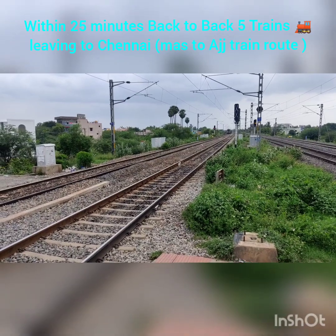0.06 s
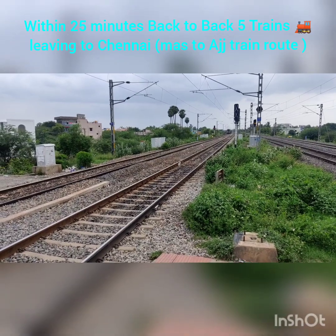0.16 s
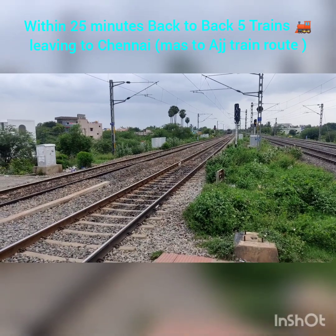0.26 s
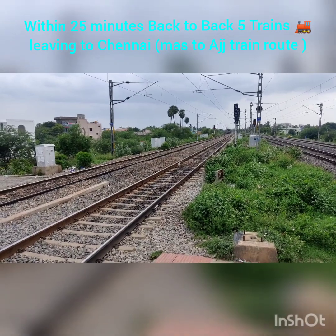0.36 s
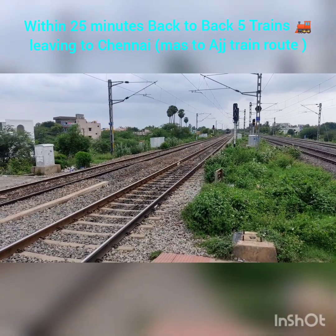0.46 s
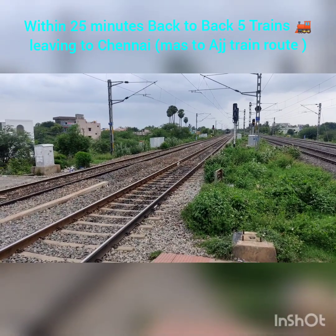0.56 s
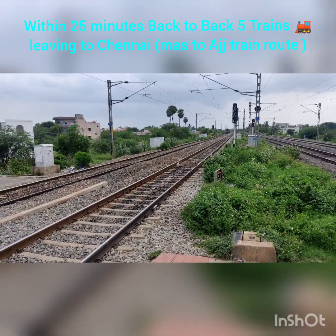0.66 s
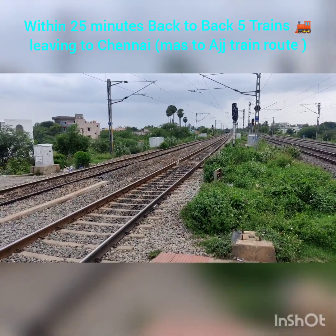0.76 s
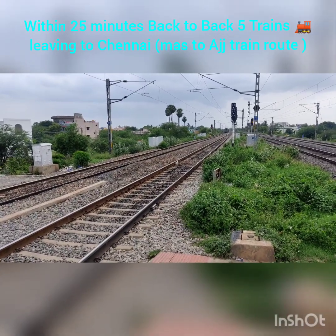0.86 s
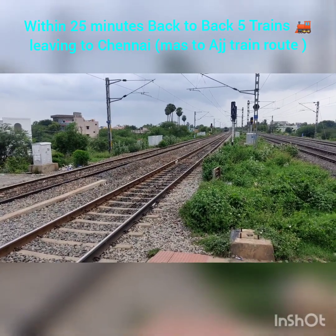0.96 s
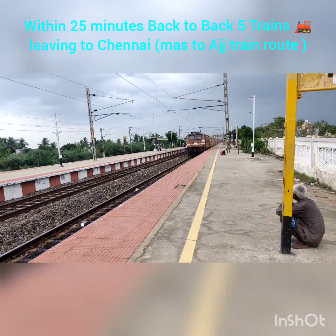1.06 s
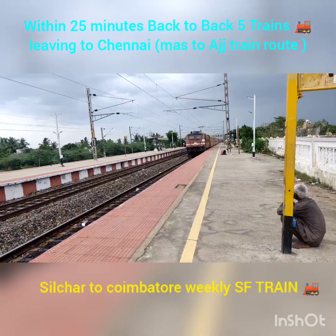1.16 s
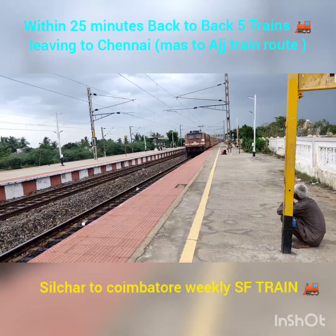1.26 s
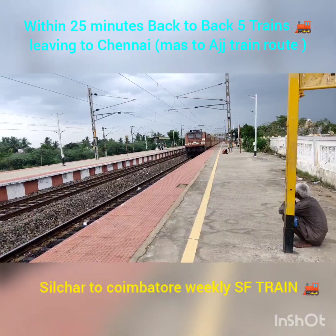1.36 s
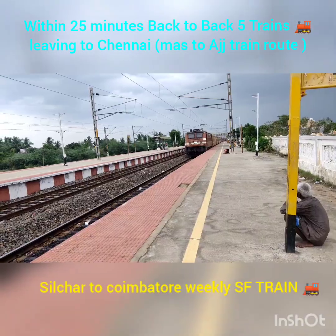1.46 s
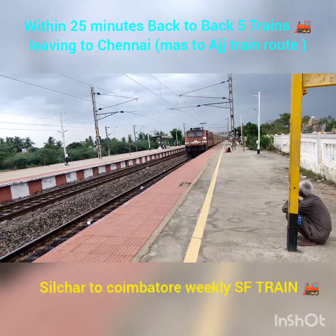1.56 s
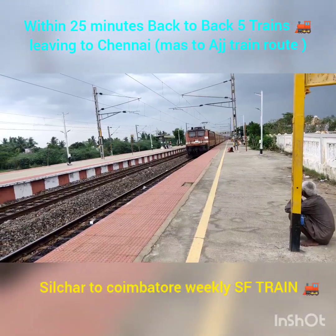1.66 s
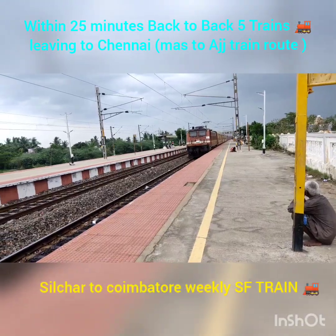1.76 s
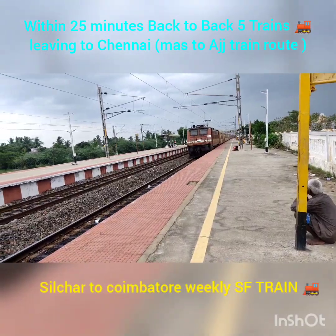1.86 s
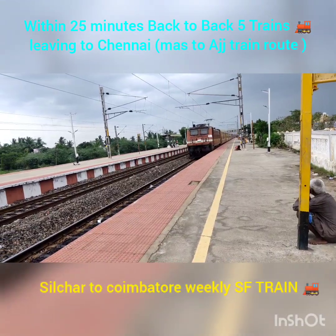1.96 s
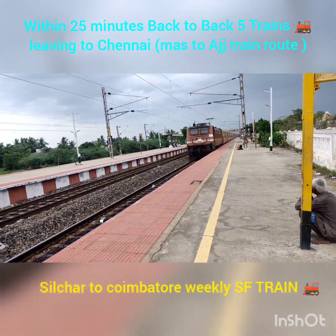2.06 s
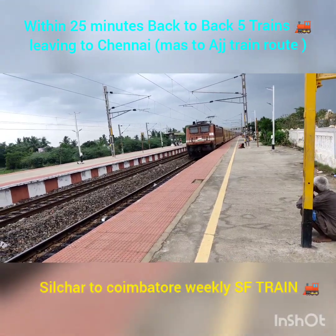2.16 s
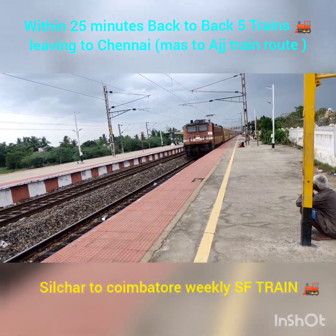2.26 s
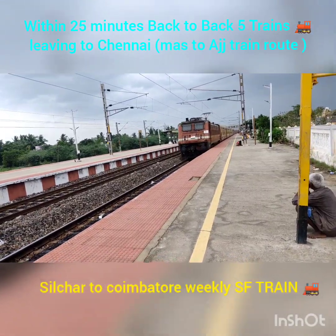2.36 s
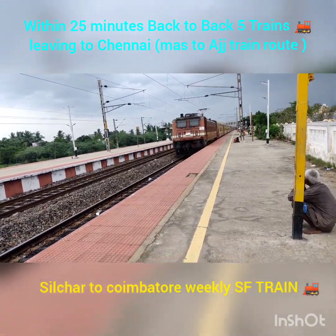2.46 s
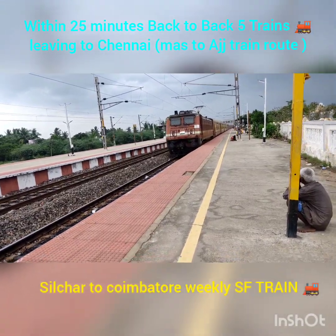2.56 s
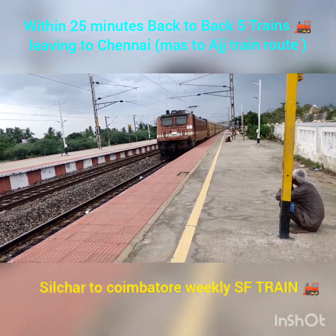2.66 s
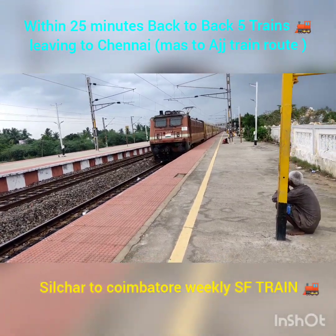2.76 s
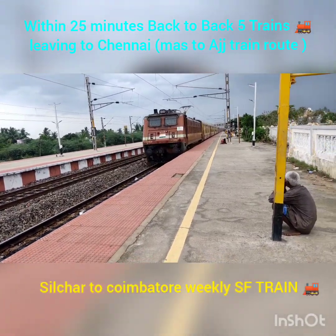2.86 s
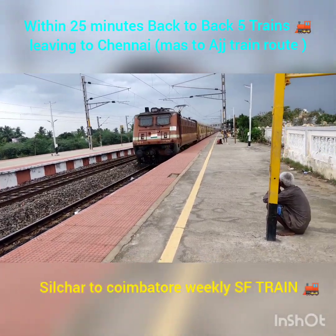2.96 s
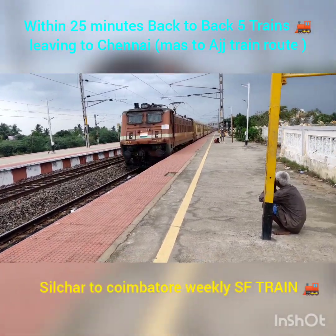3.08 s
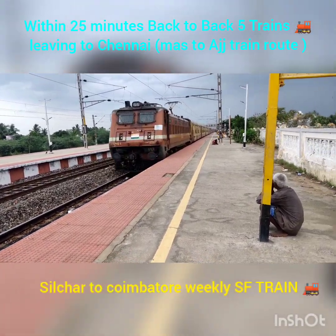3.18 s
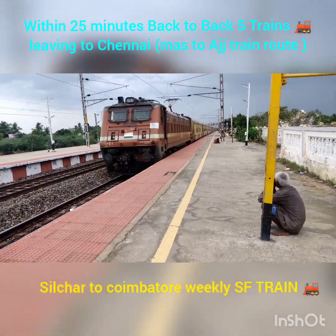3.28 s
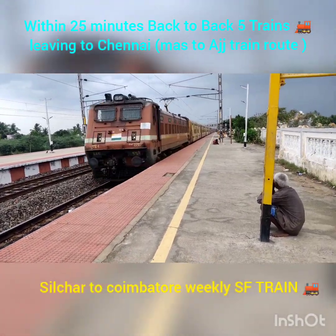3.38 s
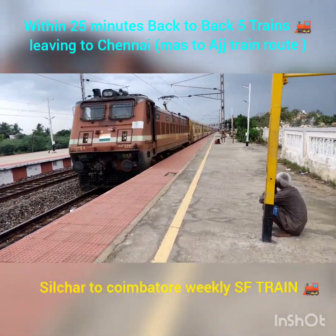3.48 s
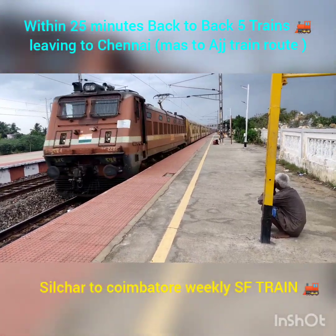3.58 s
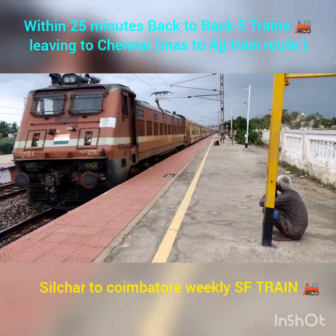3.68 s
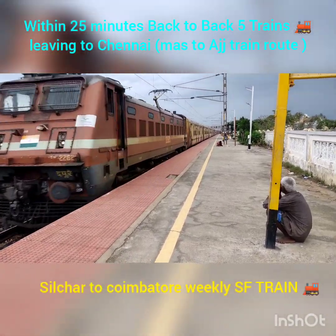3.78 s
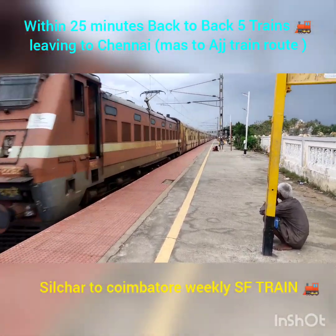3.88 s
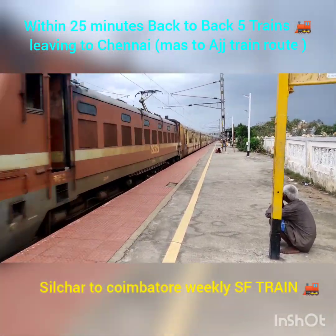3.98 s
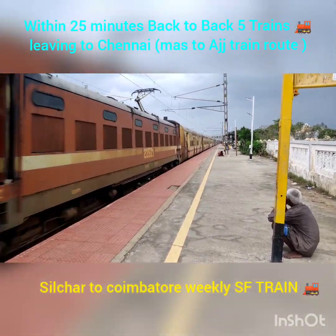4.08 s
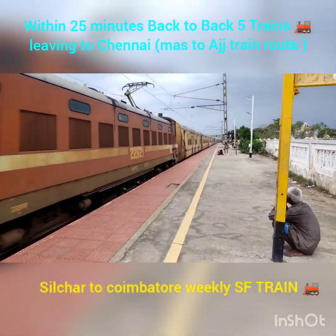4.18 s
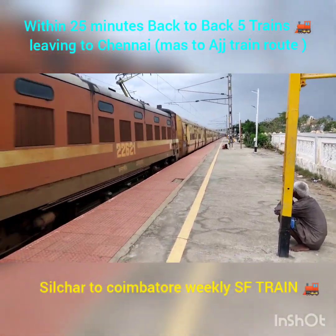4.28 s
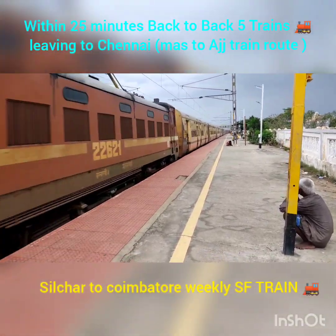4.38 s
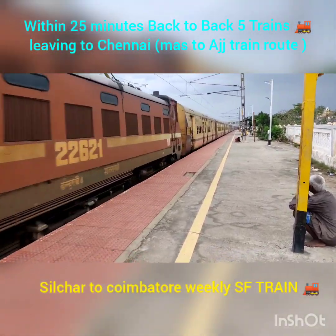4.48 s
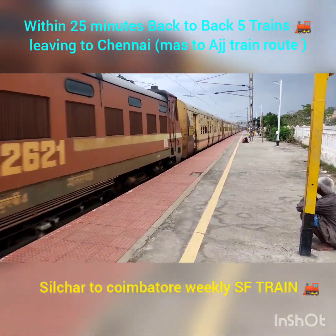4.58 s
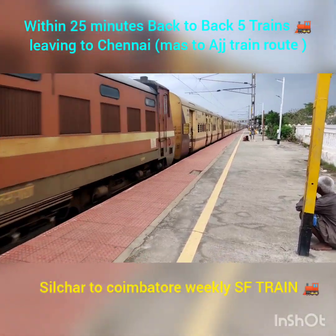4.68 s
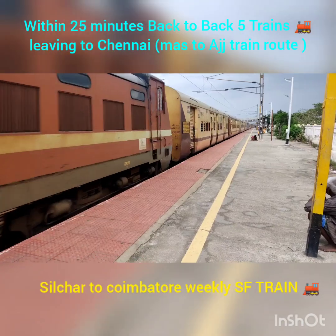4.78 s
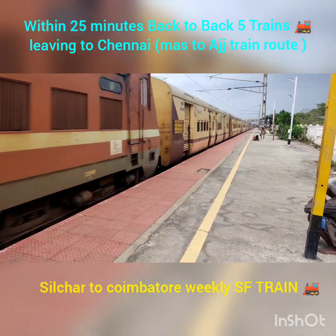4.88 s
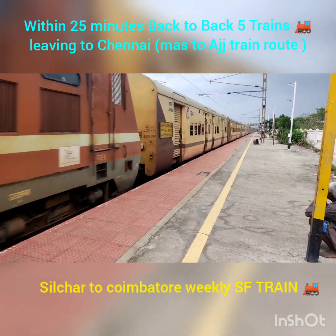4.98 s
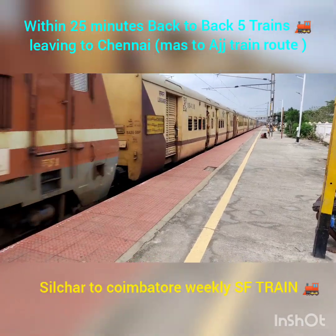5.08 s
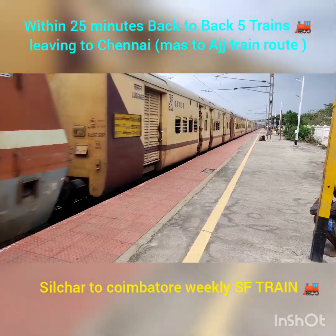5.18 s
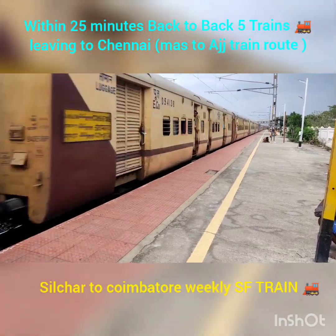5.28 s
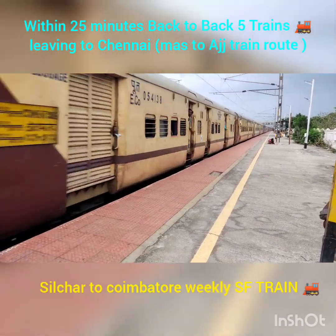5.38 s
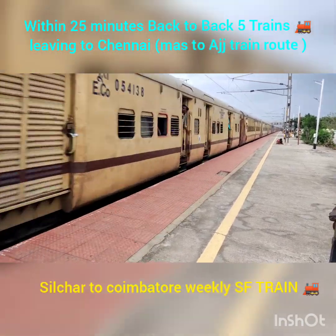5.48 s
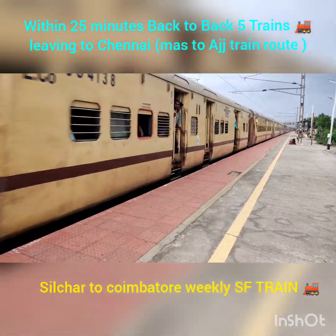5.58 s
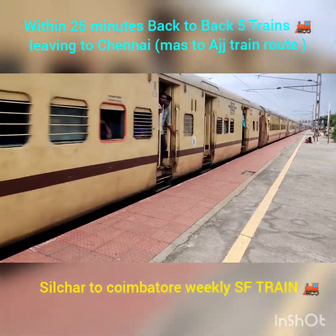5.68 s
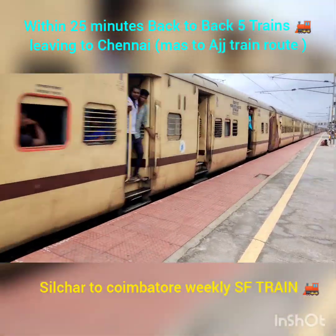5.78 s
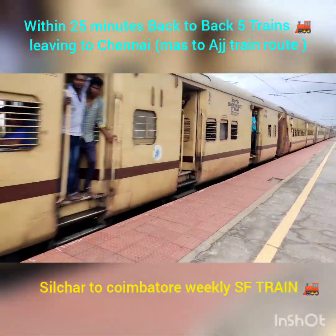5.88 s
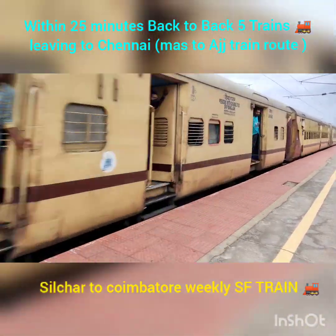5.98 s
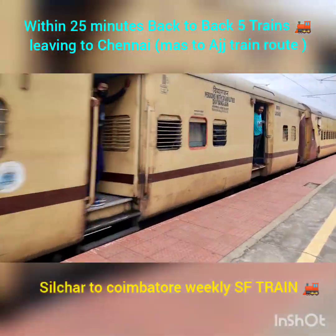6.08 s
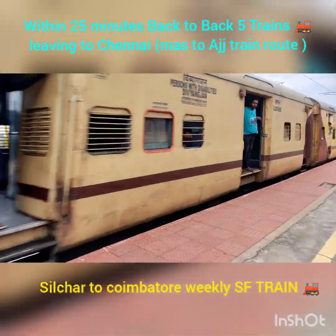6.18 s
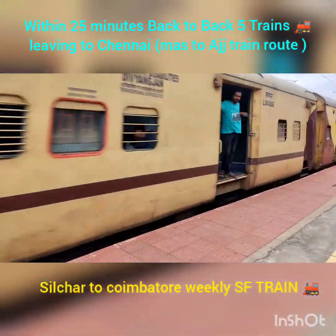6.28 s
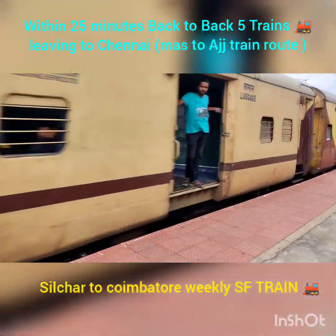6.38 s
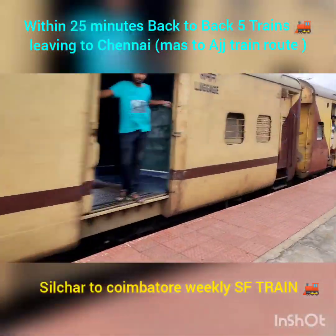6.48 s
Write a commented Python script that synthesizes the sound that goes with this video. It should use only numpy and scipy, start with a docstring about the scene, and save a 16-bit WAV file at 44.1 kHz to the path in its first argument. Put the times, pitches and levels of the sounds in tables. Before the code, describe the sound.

Soft open air, insect whine and distant chirps, then a train's rolling rumble builds, thunders close by with knocks and hissing wheels, and eases slightly.

```python
"""An electric train rolls up and passes a platform: patchy noise bands make the roar of ground, cars, rails and wheels,
notched by the bounce off the platform; wavering sines make the locomotive's hum, decaying ones thumps and short knocks.
Before it, faded out ahead of the train, a quiet trackside field: noise bands for air, leaves and an insect chorus,
a narrow whine for a near insect, bending sines for far birds. A phone with two microphone ports hears both scenes."""
import sys
import numpy as np
from scipy import signal
from scipy.fft import dct, next_fast_len
from scipy.io import wavfile
from scipy.ndimage import uniform_filter1d, map_coordinates

SR = 44100
rng = np.random.default_rng(int(sys.argv[2]) if len(sys.argv) > 2 else 0)


def master(y):
    """Save y as 16-bit WAV."""
    cut = np.clip(np.atleast_2d(y).T, -1, 1)
    pcm = np.round(cut * 32767)  # scale
    wavfile.write(sys.argv[1], SR, pcm.astype(np.int16))


N = 288086

FRAME = 1024  # samples in a noise frame, half overlapped
HZ = np.fft.rfftfreq(FRAME, 1 / SR)[:, None]
FRAME_TIMES = np.arange(-(-N * 2 // FRAME) + 1) * FRAME / 2 / SR
FIELD_N = int(1.2 * SR)  # samples of noise in the field
CLOSEST_DB = -16.5  # reference level of the car bodies as the locomotive passes
FAR_MS, NEAR_MS = 1.21, 0.44  # left-port lag of rails and wheels, in their far and near colours

# The car bodies as the train passes: [t/s, level/dB]
BODY_LEVEL = [(1.1, -39), (1.6, -35), (2.3, -32.5), (2.55, -31.5), (2.9, -27.5), (3.05, -29), (3.6, -25),
              (3.85, -24), (4.01, -24), (4.1, -19), (4.14, -17), (4.4, -16.5), (5.0, -16), (5.45, -19.5),
              (5.6, -20), (5.7, -21), (6.0, -22), (6.25, -23.5), (6.53, -21)]
# The moving platform bounce and the mix of the roar's colours:
# [t/s, first notch f/Hz, second notch f/Hz, depth of the second/dB, share of the near colour 0-1]
BOUNCE_AND_MIX = [(1.1, 556, 1230, 8.5, 0.14), (2.5, 550, 1290, 2.9, 0.08), (3.0, 626, 1590, 3.8, 0.11),
                  (3.6, 685, 1660, 4.7, 0.14), (4.0, 870, 1810, 6.6, 0.47), (4.4, 1040, 1680, 1.2, 0.83),
                  (5.4, 855, 1690, 2.2, 0.98), (5.6, 770, 1610, 8, 0.9), (5.9, 725, 1640, 7.9, 0.87),
                  (6.2, 734, 1530, 10, 0.86), (6.53, 730, 1580, 15, 0.59)]
# The roar: [t/s, rail level/dB, wheel level/dB]
ROAR_LEVELS = [(1.2, -46, -52), (1.4, -42.5, -49.5), (1.8, -41.5, -48), (2.2, -40.5, -44.5),
               (2.6, -38, -40.5), (3.03, -37.5, -37.5), (3.63, -31, -33.5), (4.1, -29, -29.5),
               (4.4, -24.5, -25), (4.75, -23.5, -25.5), (5.1, -24.5, -26), (5.25, -26.5, -26.5),
               (5.41, -27, -24.5), (5.5, -28, -29), (5.65, -30.5, -31.5), (5.8, -31.5, -32),
               (6.1, -28.5, -33), (6.34, -29.5, -34), (6.53, -32, -34)]
# Left-right balance of hiss and wash: [f/Hz, left over right/dB]
HISS_BALANCE = [(4000, -0.5), (6500, -5), (7800, -2.5), (9000, 3.5)]


def amp(db):
    """Gain for a level in dB."""
    return 10 ** (np.asarray(db) / 20)


def unit(x):
    """Scale to rms 1."""
    return x / np.sqrt(np.mean(np.abs(x) ** 2) + 1e-20)


def curves(rows, at=None):
    """Each column after the first, read per sample or at given times."""
    s, *cols = np.transpose(rows)
    return [np.interp(np.arange(N) / SR if at is None else at, s, c) for c in cols]


def wobble(rate):
    """A smooth random curve, rate knots a second."""
    knots = rng.standard_normal(int(N * rate / SR) + 4)
    return map_coordinates(knots, [np.arange(N) * rate / SR])


def swell(s, length, edge):
    """Gain 0-1 that rises, holds and falls over a length of time."""
    t = np.arange(N) / SR - s
    return np.clip(np.minimum(t, length - t) / edge, 0, 1)


def tone(hz, blur_hz):
    """A sine of rms 1 whose pitch wavers."""
    return np.sqrt(2) * np.sin(2 * np.pi * np.cumsum(hz + blur_hz * wobble(60)) / SR)


def rush(spectrum, alike, lag_ms, left_db, patchy_db, shape=1, size=5, order=9, count=N):
    """Patchy stereo noise of rms 1: a part shared by both ports, left one later, and a part that differs."""
    f, db = np.transpose(spectrum)
    both, left, right = signal.stft(rng.standard_normal((3, count)), nperseg=FRAME)[2]
    # Patches of louder and softer noise span size frames by order bins
    patches = uniform_filter1d(rng.standard_normal(both.shape), size=order, axis=0)
    patches = uniform_filter1d(patches, size=size, axis=1)
    colour_db = np.interp(np.log(HZ + 1), np.log(f + 1), db)
    gain = amp(colour_db + patchy_db * unit(patches)) * shape

    share = np.clip(alike, 0, 1)
    turn = np.exp(-1j * np.pi * HZ * lag_ms / 1000)  # half the lag, given to each side in opposite senses
    common = np.sqrt(share) * np.array([both * turn, both / turn])
    pair = common + np.sqrt(1 - share) * np.array([left, right])
    sides = amp(np.array([left_db + 0 * HZ, -left_db + 0 * HZ]) / 2)
    noise = signal.istft(pair * gain * sides, nperseg=FRAME)[1][:, :count]
    return np.pad(unit(noise), [(0, 0), (0, N - count)])


def field_air():
    """Distant murmur and open air: broad noise, the murmur drifting slowly in level."""
    # Colour of the distant murmur: [f/Hz, relative level/dB]
    murmur_colour = [(12, -50), (20, -25), (54, -8.5), (73, 10), (113, -52), (160, -23), (210, -12),
                     (350, -120)]
    # Colour of the air, which the ports share less as pitch rises: [f/Hz, relative level/dB]
    air_colour = [(65, -47), (110, -17), (267, -6.5), (296, -2), (502, -12), (797, -7.5), (1160, -17.5),
                  (1900, -17), (2910, -24), (3340, -25), (3960, -27), (6500, -35.5), (8450, -58),
                  (14300, -120)]
    murmur = rush(murmur_colour, alike=0.92, lag_ms=0.022, left_db=5.5, patchy_db=0.5, count=FIELD_N)
    air = rush(air_colour, alike=400 / (HZ + 150), lag_ms=0.1, left_db=2.5, patchy_db=1.0, count=FIELD_N)
    return amp(-51 + 2.3 * wobble(6.5)) * murmur + amp(-49.5) * air


def insect_chorus():
    """Many insects blur into one high noise band that drifts in level."""
    # Colour of the chorus: [f/Hz, relative level/dB]
    chorus_colour = [(3240, -51), (5500, -23), (7350, -9), (7710, -13.5), (9250, -21), (9870, -32),
                     (11100, -27), (12900, -23), (15500, -56)]
    chorus = rush(chorus_colour, alike=0.65, lag_ms=0.0092, left_db=1.5, patchy_db=3.5, count=FIELD_N)
    return amp(-61.5 + 2.3 * wobble(9.7)) * chorus


def rustle():
    """Leaves rustle once: a short, unsteady burst of noise."""
    # Colour of the leaves: [f/Hz, relative level/dB]
    leaf_colour = [(500, -120), (1100, -20), (1500, -2), (2000, 0), (2500, -6), (3500, -30), (8000, -120)]
    leaves = rush(leaf_colour, alike=0.4, lag_ms=0.3, left_db=2.5, patchy_db=1.5, count=FIELD_N)
    return amp(-51 + 2.5 * wobble(60)) * swell(0.89, 0.085, edge=0.012) * leaves


def birds():
    """Far bird notes: each sine bends through three pitches, unsteady in pitch and level."""
    # Notes: [t/s, length/s, first f/Hz, middle f/Hz, last f/Hz, base level/dB]
    bird_notes = [(.33, .036, 4050, 4080, 4040, -63), (.372, .025, 3600, 3450, 3350, -71),
                  (.397, .028, 3300, 3150, 2980, -64), (.608, .05, 2760, 2920, 3070, -64),
                  (.655, .05, 3070, 3120, 3080, -72), (.7, .068, 3080, 2990, 2720, -67),
                  (.655, .028, 3400, 3700, 3930, -69), (.675, .035, 3930, 3960, 3940, -64),
                  (.978, .02, 3400, 3550, 3800, -64), (.99, .03, 4000, 4060, 4020, -67)]
    song, flutter, waver_hz = np.zeros(N), amp(2.2 * wobble(80)), 35 * wobble(60)
    for s, length, *pitches_hz, db in bird_notes:
        progress = np.clip((np.arange(N) / SR - s) / length, 0, 1)
        bend = np.polyfit([0, 0.5, 1], pitches_hz, deg=2)
        hz = np.polyval(bend, progress) + waver_hz
        note = np.sqrt(2) * np.sin(2 * np.pi * np.cumsum(hz) / SR)
        song += amp(db) * swell(s, length, edge=0.007) ** 2 * note
    return song * flutter * amp([[1.5], [-1.5]])  # louder on the left


def near_insect():
    """The nearest insect: a steady whine with swells, a tonal core within a narrow noise band."""
    # Swells over the whine: [t/s, length/s, base level/dB]
    insect_swells = [(0, 0.12, -60), (0.16, 0.14, -70), (0.408, 0.1, -69), (0.48, 0.22, -59),
                     (0.7, 0.2, -67), (.9, 0.11, -68)]
    # Colour of the narrow wing band: [f/Hz, relative level/dB]
    wing_colour = [(6900, -60), (7100, -11), (7200, 14), (7300, -28), (7500, -62)]
    song = amp(-64) + sum(amp(db) * swell(s, length, edge=0.032) for s, length, db in insect_swells)
    core = amp(-2 + 2 * wobble(25)) * tone(7195, blur_hz=22) * amp([[-4], [2]])
    wings = rush(wing_colour, alike=0.95, lag_ms=0, left_db=-23, patchy_db=0.5, count=FIELD_N)
    return 0.77 * song * (core + wings)  # trims whine and swells alike


def field():
    """The quiet field, all its sources fading out together."""
    cut_s, fade_out_s = 1.017, 0.035
    fade = np.clip(1 - (np.arange(N) / SR - cut_s) / fade_out_s, 0, 1) ** 3
    return (field_air() + insect_chorus() + near_insect() + birds() + rustle()) * fade


def thumps_and_knocks():
    """Low thumps and short pitched knocks or whines, each a quickly rising, decaying sine."""
    # Thumps and knocks: [t/s, base level before rise and decay/dB, f/Hz, fall by 60 dB/s]
    short_rings = [(2.869, -14, 293, 0.057), (4.125, -11.5, 193, 0.27), (4.2, -17, 417, 0.18),
                   (4.45, -13.5, 539.6, 0.19), (4.519, -11.5, 139.5, 0.18), (4.64, -10, 130.5, 0.12),
                   (4.95, -9.5, 387, 0.23), (5.253, -9, 117, 0.1), (5.258, -10, 625, 0.1),
                   (5.41, -7.5, 130, 0.12), (5.589, -8.5, 299.5, 0.2), (6.438, -16, 153, 0.23)]
    sound, t = np.zeros(N + SR), np.arange(SR // 2) / SR
    for s, db, hz, t60 in short_rings:
        ring = (1 - np.exp(-t / 0.0054)) * amp(db - 60 * t / t60)
        # A loose phase keeps the thump from ringing like a bell
        drift = 0.0038 * np.cumsum(uniform_filter1d(rng.standard_normal(len(t)), size=40))
        sound[round(s * SR):][:len(t)] += ring * np.sin(2 * np.pi * hz * t + drift)
    return sound[:N]


def locomotive_hum():
    """Transformer and blowers hum: a wavering tone and its octave, in swells."""
    # Swells of the hum: [t/s, length/s, f/Hz, base level/dB]
    hum_swells = [(3.918, 0.075, 306.6, -27.5), (4.042, 0.18, 307.3, -32), (4.259, 0.11, 300.6, -24.5),
                  (4.4, 0.11, 293.9, -20), (4.617, 0.102, 298, -23), (4.761, 0.098, 306, -21),
                  (5.017, 0.22, 320, -24.5), (5.238, 0.12, 298, -27)]
    waver_db, octave_db = 3.5, -9
    level = sum(amp(db) * swell(s, length, edge=0.0074) for s, length, _, db in hum_swells)
    # Pitch holds through each swell and glides to the next
    pitch_points = [(s + end * length, hz) for s, length, hz, _ in hum_swells for end in (0, 1)]
    pitch_hz = curves(pitch_points)[0]
    low_tone = amp(waver_db * wobble(20)) * tone(pitch_hz, blur_hz=17)
    octave = amp(octave_db + waver_db * wobble(11)) * tone(2 * pitch_hz, blur_hz=15)
    return level * (low_tone + octave)


def locomotive():
    """Hum, thumps and knocks together, slightly louder on the left."""
    return (locomotive_hum() + thumps_and_knocks()) * amp([[1.3], [-1.3]])


def treble(surge):
    """Hiss, a thin sizzle above it and steady air under it; passing wheels make hiss and sizzle flicker."""
    # Levels: [t/s, base hiss level/dB, base sizzle level/dB]
    treble_levels = [(1.3, -50.5, -72), (1.9, -46.5, -71), (2.45, -46.5, -71), (3.0, -41, -61.5),
                     (3.45, -43.5, -72), (3.8, -41, -65), (4.09, -37, -67), (4.14, -33, -64),
                     (4.3, -32.5, -60), (4.5, -28.5, -54), (4.72, -31, -56), (4.95, -31.5, -56),
                     (5.1, -26.5, -56), (5.4, -31, -57), (5.6, -35.5, -65), (5.85, -34.5, -58),
                     (5.92, -36.5, -65), (6.2, -41, -65), (6.42, -35, -66), (6.53, -34.5, -66)]
    # Brief flares of hiss and sizzle: [t/s, length/s, rise/dB]
    treble_flares = [(3.055, 0.021, 8.5), (4.404, 0.033, 4), (4.532, 0.053, 4), (4.85, 0.064, 7.5),
                     (5.245, 0.052, 2.5), (5.456, .03, 2), (5.57, .025, 3), (5.655, 0.056, 2),
                     (5.78, 0.077, 1.5)]
    # Slow rise and fall of the air against the hiss, around 6.5 dB under it: [t/s, level/dB]
    wash_swing = [(1.2, -2.5), (2.3, -3), (2.75, -1), (3.6, 1), (4.1, -0.5), (4.6, -0.5), (5.5, 1),
                  (6.0, 3), (6.53, 1.5)]
    # Colours of hiss, sizzle and air: [f/Hz, relative level/dB]
    hiss_colour = [(3000, -120), (5500, -40), (6670, -2), (7370, 7), (7810, 5), (8980, -1), (9660, -18),
                   (10000, -15), (13000, -87), (22000, -120)]
    sizzle_colour = [(5760, -34), (9800, -9), (10100, 0.5), (11300, -3), (14000, -4.5), (15600, -15)]
    wash_colour = [(2500, -48), (3240, -1.5), (4500, -2.5), (5500, -3.5), (6400, 0), (7200, -45),
                   (9000, -120)]

    near_share = curves(BOUNCE_AND_MIX)[-1]
    near = curves(BOUNCE_AND_MIX, FRAME_TIMES)[-1]
    steady_db = curves(treble_levels)
    flares_db = sum(db * swell(s, length, edge=0.01) for s, length, db in treble_flares)
    hiss_db, sizzle_db = steady_db + flares_db + 1.2 * near_share * wobble(23)
    wash_db = steady_db[0] - 6.5 + curves(wash_swing)[0]

    hz, left_db = np.transpose(HISS_BALANCE)
    balance_db = np.interp(HZ, hz, left_db)
    patchy_db = 1 + 2.5 * near  # far hiss is smooth, near hiss is patchier
    hiss = rush(hiss_colour, alike=0.55, lag_ms=0, left_db=balance_db, patchy_db=patchy_db, size=4, order=5)
    wash = rush(wash_colour, alike=0.23, lag_ms=0, left_db=balance_db, patchy_db=patchy_db, size=4, order=3)
    sizzle = rush(sizzle_colour, alike=0.6, lag_ms=0, left_db=0, patchy_db=4, size=5)
    return amp(hiss_db + 0.3 * near_share * surge) * hiss + amp(wash_db) * wash + amp(sizzle_db) * sizzle


def ground_rumble():
    """The ground shakes under the train: deep noise that loosely follows the car bodies' level."""
    # Colour of the rumble: [f/Hz, relative level/dB]
    rumble_colour = [(12, -46), (20, -10), (50, 2.5), (86, 3.5), (130, -20), (170, -9), (290, -120)]
    # How it follows the bodies: (level as the locomotive passes/dB, gain for each dB of the bodies/dB)
    ground_follow = (-31.5, 0.92)
    # Slow rise and fall of the rumble against the bodies: [t/s, level/dB]
    ground_swing = [(1.1, -1), (2.9, -1), (4.0, 1), (5.3, 1), (5.49, 2.5), (5.8, 2), (6.1, -2), (6.53, 3.5)]
    top_db, growth = ground_follow
    near = curves(BOUNCE_AND_MIX, FRAME_TIMES)[-1]
    level_db = top_db + growth * (curves(BODY_LEVEL)[0] - CLOSEST_DB) + curves(ground_swing)[0]
    # Both ports hear nearly the same, a little less so as the near share grows
    rumble = rush(rumble_colour, alike=1 - 0.089 * near, lag_ms=0.05, left_db=5.5 - 4.6 * near, patchy_db=-0.5)
    return amp(level_db + 1.5 * wobble(10)) * rumble


def platform_bounce():
    """The echo off the platform cancels direct sound at two moving notches, and two fixed ones that vary in depth."""
    # The fixed notches, shallower as the near share grows: [f/Hz, depth at no near share/dB]
    upper_notches = [(2250, 9), (3200, 15)]
    first_hz, second_hz, second_db, near = curves(BOUNCE_AND_MIX, FRAME_TIMES)

    def notch(hz, db, width):
        return amp(-db * np.exp(-(np.log(HZ / hz + 1e-9) / width) ** 2))

    bounce = notch(first_hz, 7 - 4.5 * near, 0.1) * notch(second_hz, second_db, 0.07)
    # At a grazing angle all above the second notch stays weak
    bounce *= amp(-7 * (1 - near) / (1 + (second_hz / (HZ + 1)) ** 24))
    for hz, db in upper_notches:
        bounce *= notch(hz, db * (1 - near), 0.012)
    return bounce


def far_thinness():
    """Below a shelf the far train is thin; the bass grows with the car bodies' level."""
    shelf_hz, growth = 242, 0.29  # growth: dB for each dB of the bodies
    rise_db = growth * (curves(BODY_LEVEL, FRAME_TIMES)[0] - CLOSEST_DB)
    return amp(rise_db / (1 + (HZ / shelf_hz) ** 6))


def mix_colours(far, close):
    """Far-coloured and near-coloured noise mixed at equal power by the near share."""
    near_share = curves(BOUNCE_AND_MIX)[-1]
    return np.sqrt(1 - near_share) * far + np.sqrt(near_share) * close


def car_bodies(surge, bounce, thin):
    """The shaken cars and bogies drone: low noise with slow and fast unevenness."""
    # Far and near colours: [f/Hz, relative level/dB]
    far_colour = [(40, -120), (110, -39), (160, 4.5), (220, -0.5), (280, 7), (340, -2.5), (420, -1),
                  (520, -10), (700, -11.5), (1500, -120)]
    near_colour = [(35, -120), (100, -6.5), (160, -1), (220, 2), (300, -4.5), (420, -0.5), (600, -4),
                   (800, -8.5), (2000, -120)]
    far = rush(far_colour, 1.2 - HZ / 1500, 0.21 * FAR_MS, 4.6, patchy_db=1.57, shape=bounce * thin)
    close = rush(near_colour, 1.05 - HZ / 1200, 0.78 * NEAR_MS, 2.5, patchy_db=1.5, shape=bounce, size=3, order=3)
    level_db = curves(BODY_LEVEL)[0] + 0.39 * surge + 0.61 * wobble(22)
    return amp(level_db) * mix_colours(far, close)


def rails(surge, bounce, thin):
    """Roughness under the wheels makes the rails roar in the middle range."""
    # Far and near colours: [f/Hz, relative level/dB]
    far_colour = [(300, -120), (620, -10), (760, -2.5), (950, -3), (1150, -1), (1600, -9), (2200, -29),
                  (4000, -120)]
    near_colour = [(350, -120), (750, 11), (1000, 13.5), (1400, 7), (1800, 6.5), (4000, -120)]
    far = rush(far_colour, 0.45, FAR_MS, 3.8, patchy_db=1.57, shape=bounce * thin)
    close = rush(near_colour, 0.5, NEAR_MS, 2.5, patchy_db=2.2, shape=bounce, size=3, order=3)
    return amp(curves(ROAR_LEVELS)[0] + 0.5 * surge) * mix_colours(far, close)


def wheels(surge, bounce, thin):
    """The same roughness makes the wheels roar, reaching higher than the rails."""
    # Far and near colours: [f/Hz, relative level/dB]
    far_colour = [(880, -22), (1500, -10.5), (1950, 5), (2240, -3.5), (2570, -1), (4050, -14.5),
                  (5710, -40), (6500, -27), (8450, -39), (14300, -120)]
    near_colour = [(760, -47), (1300, 4), (1570, -2), (1990, 1.5), (2400, 0.5), (3380, -5), (3900, -8.5),
                   (4900, -16.5), (6500, -12.5), (8450, -76), (14300, -120)]
    far = rush(far_colour, 0.55, FAR_MS, 3.5, patchy_db=1.57, shape=bounce * thin)
    close = rush(near_colour, 0.55, NEAR_MS, 4.2, patchy_db=2.2, shape=bounce, size=3, order=3)
    return amp(curves(ROAR_LEVELS)[1] + 0.5 * surge) * mix_colours(far, close)


def rolling():
    """Wheel and rail roughness shakes ground, cars, rails and wheels."""
    resume_s, fade_in_s, end_fade_s = 1.097, 0.2, 0.004
    surge = wobble(7)  # unevenness of the rail, felt by bodies, rails, wheels and hiss
    bounce, thin = platform_bounce(), far_thinness()
    sound = treble(surge) + ground_rumble() + car_bodies(surge, bounce, thin)
    sound += rails(surge, bounce, thin) + wheels(surge, bounce, thin)
    t = np.arange(N) / SR
    return sound * np.clip(np.minimum((t - resume_s) / fade_in_s, (t[-1] - t) / end_fade_s), 0, 1)


def scene():
    """Field, then train."""
    return field() + locomotive() + rolling()


def record(dry):
    """The phone rounds off its loudest peaks and keeps nothing above its band limit."""
    top_hz = 15720
    soft = dry / (1 + np.abs(dry / 0.97) ** 6) ** (1 / 6)
    m = next_fast_len(N + FRAME)
    cosines = dct(np.pad(soft, [(0, 0), (0, m - N)], "reflect"), norm="ortho")
    kept = cosines * (np.arange(m) * SR / (2 * m) < top_hz)
    return dct(kept, type=3, norm="ortho")[:, :N]


dry = scene()
out = record(dry)
master(out)
```